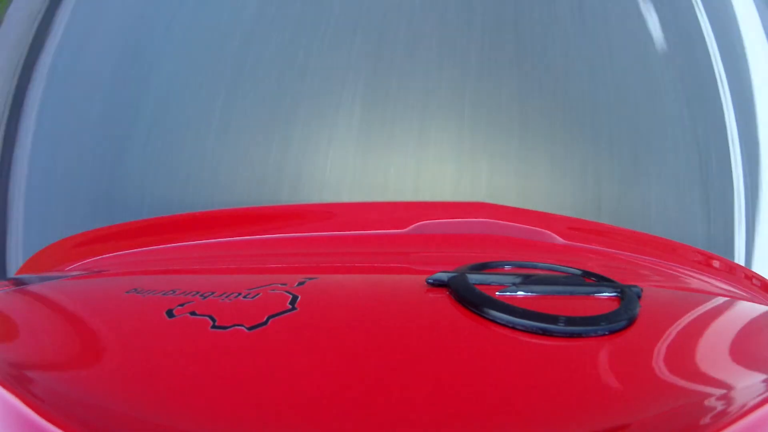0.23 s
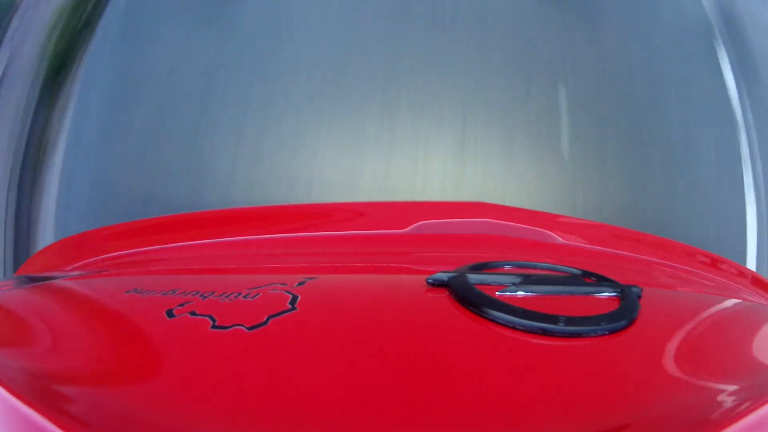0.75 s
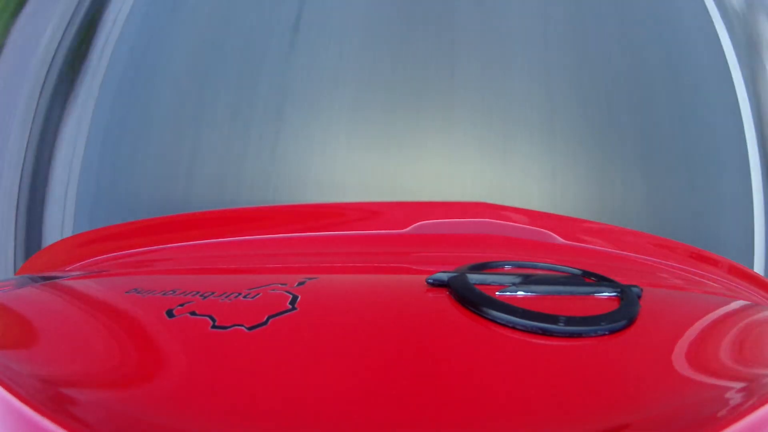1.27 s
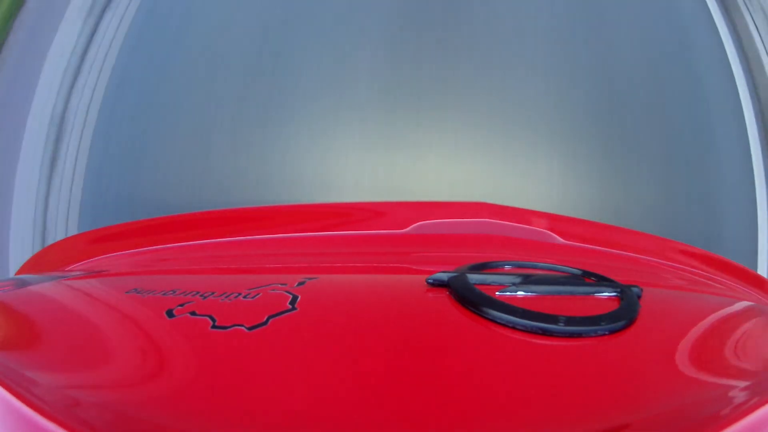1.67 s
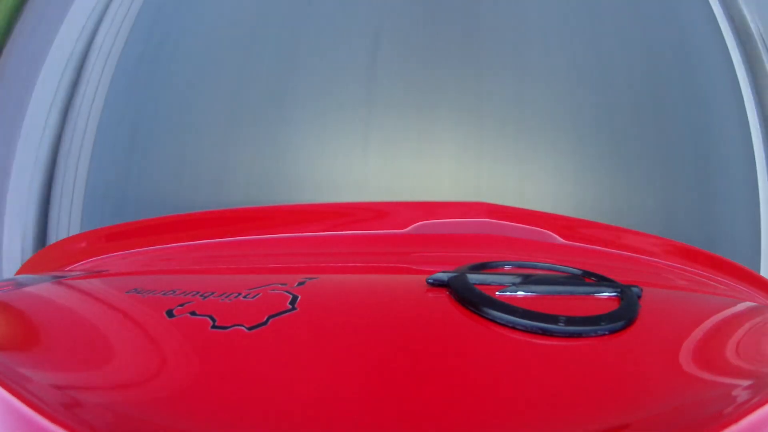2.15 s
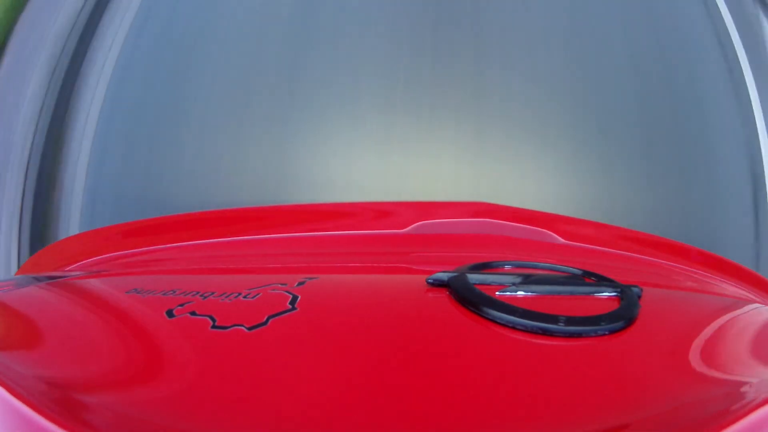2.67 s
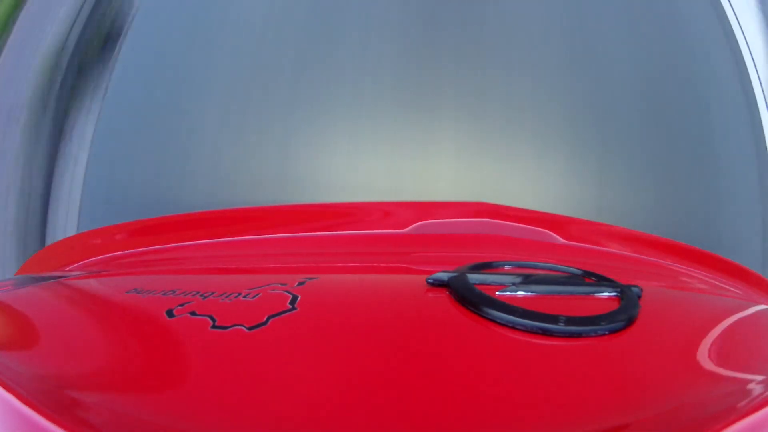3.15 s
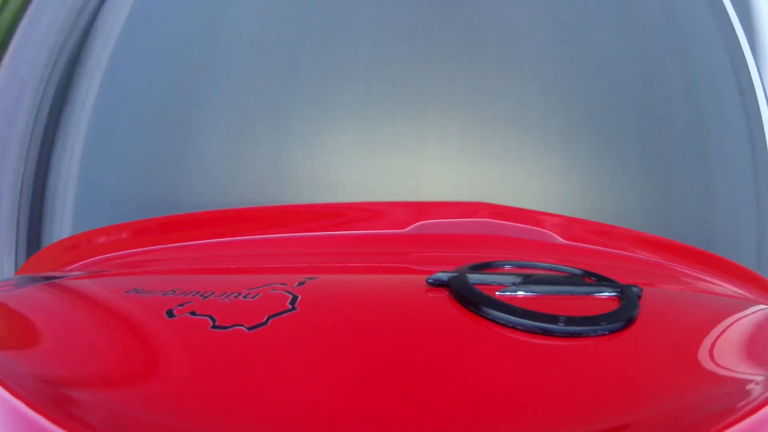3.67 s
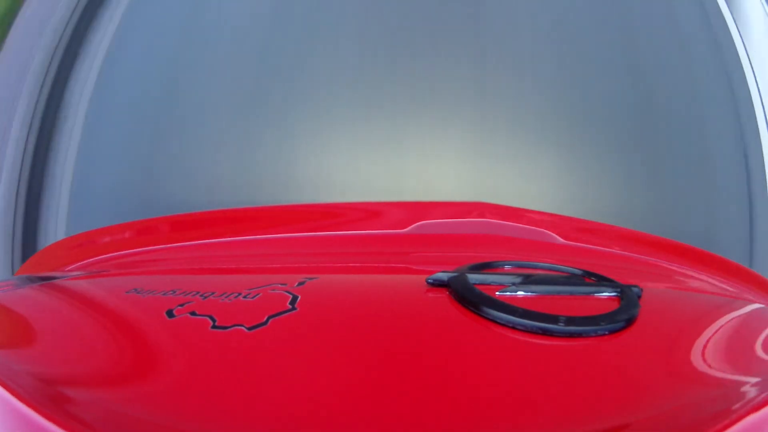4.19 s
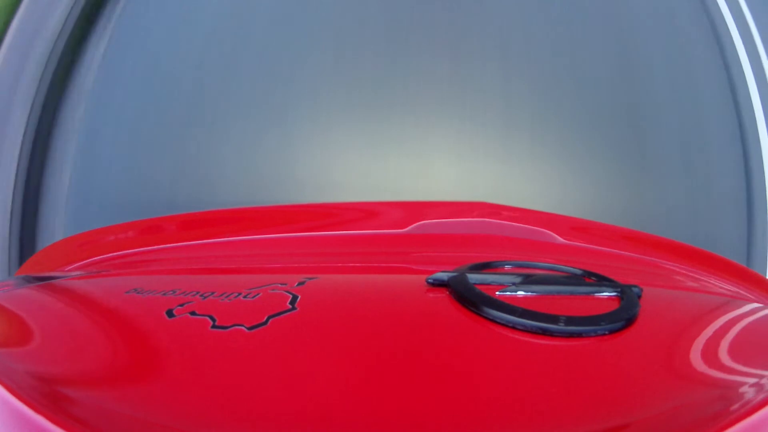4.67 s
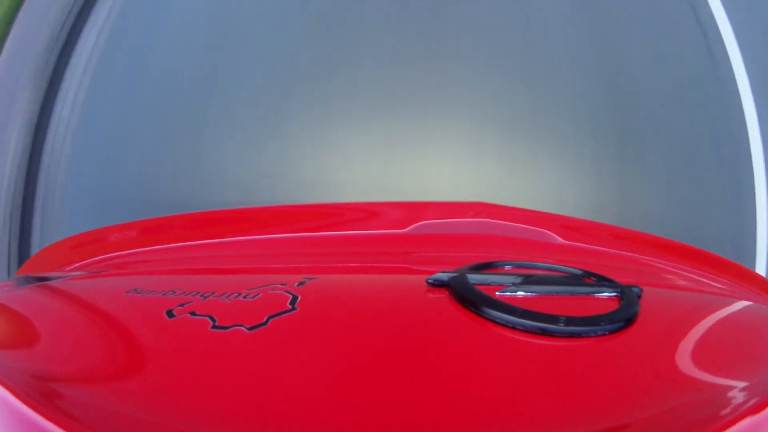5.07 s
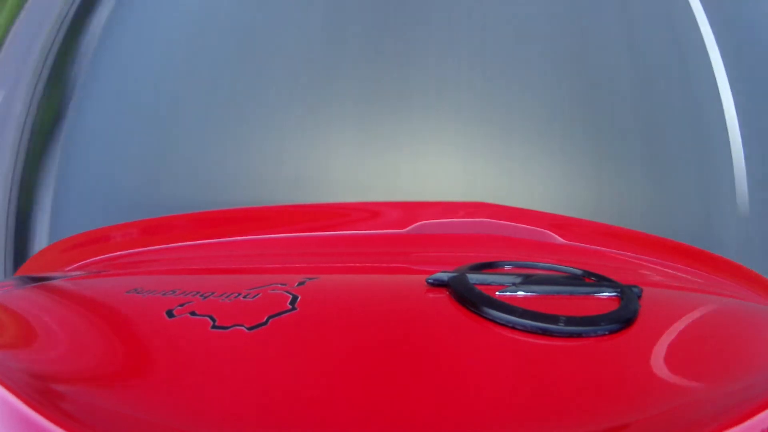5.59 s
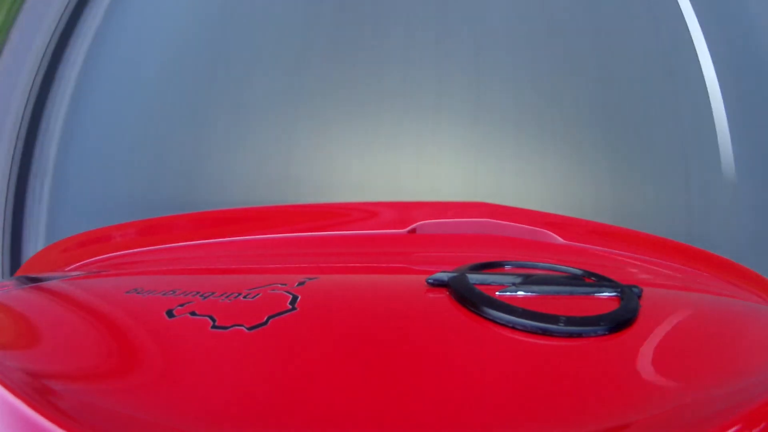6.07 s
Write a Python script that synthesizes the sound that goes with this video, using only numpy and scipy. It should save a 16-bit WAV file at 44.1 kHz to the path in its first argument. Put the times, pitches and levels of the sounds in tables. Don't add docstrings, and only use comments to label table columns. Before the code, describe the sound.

A small turbocharged car's exhaust booms up through one long gear pull, then the throttle lifts and the mount rattles over wind and tyre roar.

```python
import sys
import numpy as np
from scipy import signal
from scipy.fft import rfft, irfft
from scipy.io import wavfile
from scipy.ndimage import uniform_filter1d, minimum_filter1d

SR = 44100
rng = np.random.default_rng(int(sys.argv[2]) if len(sys.argv) > 2 else 0)


def level_to_linear(level):
    exponent = np.asarray(level, float) / 20
    return 10 ** exponent


def transcribe(u):
    v = np.clip(np.atleast_2d(u).T, -1, 1)
    q = np.round(v * 32767).astype(np.int16)
    wavfile.write(sys.argv[1], SR, q)


N = 279594

# frequency in Hz, density in dB per Hz.
HISS_SPECTRUM = [(3000, -23), (5000, -11.5), (7000, -7.5), (10500, -0.5), (12500, -2), (13800, -6),
                 (14800, -1.5), (16500, -15.5)]
# frequency in Hz, density in dB per Hz.
BUFFET_SPECTRUM = [(12, -4), (25, -8.5), (45, 3.5), (70, -16), (120, -17)]
# frequency in Hz, density in dB per Hz.
WAKE_SPECTRUM = [(45, -8), (70, -2.5), (130, -1), (250, -4), (380, -5), (480, -15.5), (650, -41)]
# centre in seconds, rise over the steady wind in dB, half width in seconds.
GUSTS = [(0, -3, 0.18), (.45, 7, .05), (.68, 7, 0.07), (1.7, 1, 0.19), (3.15, 2, .06), (3.6, 11.5, 0.16),
         (4.22, 3.5, 0.12), (4.55, 11, .12), (5.24, 3.5, 0.096), (5.75, 8, 0.042), (6.17, 9.5, 0.05),
         (6.34, 15.5, 0.025)]
# frequency in Hz, density in dB per Hz.
TYRE_SPECTRUM = [(250, -29), (420, -13), (525, -7), (634, -5.5), (733, -5), (792, -0.5), (978, -3.5),
                 (1070, 3), (1160, -3), (1480, -6.5), (1530, -12), (1650, -9.5), (2160, -27.5),
                 (3080, -31.5), (6000, -52), (7800, -89), (13200, -120)]
# frequency in Hz, level in dB, t60 in seconds.
MOUNT_MODES = [(3800, -10, .005), (4500, -4, .007), (5400, 0, .009), (7100, -3, .007), (9300, 0, .01),
               (13000, -11, .005)]
# start in seconds, peak in dB.
KNOCKS = [(5.216, -24), (5.2249, -27), (5.2277, -19), (5.2411, -25), (5.4207, -12), (5.4558, -14),
          (5.4629, -22), (5.4729, -21), (5.4775, -21), (5.5006, -28), (5.5087, -26), (5.5193, -33),
          (5.5328, -36), (5.55, -37), (5.5581, -34), (5.5667, -33), (5.5748, -35), (5.5921, -33),
          (5.6233, -33), (5.6772, -37), (5.7054, -35), (5.7394, -28), (6.1795, -27), (6.2122, -32),
          (6.216, -29), (6.2383, -31), (6.2538, -34), (6.2711, -28), (6.2938, -33), (6.3322, -23)]
# start in seconds, peak in dB, ring in Hz.
GRIT = [(.645, -41, 7400), (.695, -34, 3300), (.71, -30, 3660), (.725, -35, 4100), (.74, -33, 2980),
        (.76, -57, 10800), (.77, -47, 6300), (.824, -37, 4400), (.879, -35, 5840), (.885, -39, 12500),
        (.91, -44, 12500), (.955, -33, 10500), (.957, -32, 13500), (1.0, -39, 12000), (1.05, -39, 5500),
        (1.06, -37, 10800), (1.085, -44, 11500), (1.13, -48, 5600), (1.19, -43, 11000), (1.22, -42, 9800),
        (1.324, -34, 4050)]
# frequency in Hz, density in dB per Hz.
CRACK_SPECTRUM = [(1800, -22), (3000, -9), (4800, 0), (7800, -4), (9400, 0), (11000, -10), (15500, -12)]
# start in seconds, level in dB, pitch in Hz, t60 in seconds.
DRIVELINE_THUMP = (5.213, -14, 52, .2)
# time in seconds, low centre in Hz, high centre in Hz, level in dB.
SPOOL = [(0, 3000, 6000, -90), (.6, 3200, 6500, -68), (.72, 3700, 7800, -51), (.9, 4600, 9800, -57),
         (1.08, 5500, 12000, -56), (1.3, 5700, 13500, -63), (1.7, 6200, 15000, -80),
         (6.34, 6200, 15000, -95)]
# time in seconds, roar level in dB, extra hiss from boost in dB.
FLOW = [(0, -38.5, 1), (.4, -36, -0.5), (1.04, -34, 0.5), (2, -29.5, -5), (2.4, -29, -1), (2.9, -30, 0.5),
        (3.15, -25, -0.5), (3.6, -22, -1.5), (4.2, -21.5, 0.5), (4.48, -17.5, 0.5), (4.75, -18.5, -0.5),
        (5.02, -21, -4), (5.2, -23, 0.5), (5.9, -21.5, -6), (6.34, -22, -4)]
# frequency in Hz, density in dB per Hz.
GAS_SPECTRUM = [(1350, -19.5), (2300, -1), (2670, -11), (2980, -8), (3540, -11), (4110, -9.5), (4480, -15),
                (4880, -12), (5990, -19), (7640, -20.5), (8730, -30), (12600, -29.5), (14400, -27.5),
                (15000, -28.5)]
# frequency in Hz, density in dB per Hz.
RASP_SPECTRUM = [(1200, -27.5), (1500, -5), (1900, 2), (2250, -10.5), (2550, -31), (2900, -13),
                 (3600, -41.5)]
# frequency in Hz, density in dB per Hz.
PIPE_ROAR_SPECTRUM = [(330, -6), (560, -9.5), (656, -9.5), (729, -0.5), (821, -2.5), (908, -6.5),
                      (970, -3.5), (1070, -4), (1280, -10.5), (1460, -11.5), (1600, -15), (2080, -39),
                      (3520, -120)]
# time in seconds, firing rate in Hz.
REVS = [(0, 58.4), (.2, 56.2), (.8, 63.5), (1.4, 72.7), (2, 84.8), (2.6, 98.9), (3.2, 117.4), (4, 144.8),
        (4.7, 167), (5, 173.7), (5.1, 172.4), (5.38, 161.9), (6, 146.5), (6.34, 127)]
# time in seconds, strength in dB, sharpness in dB per order.
PULSE = [(0, -10, 0.1), (.35, -3, -1.9), (.85, -6, -0.9), (1.3, -4.5, -3), (1.45, -4, .5),
         (1.8, -3.75, 0.94), (2.3, 1, -4), (2.8, 2.5, -1.1), (3.5, -1.05, -1.74), (4.2, -7, 2.5),
         (5.07, -13.5, 3.5), (5.14, -12, 8), (5.26, -16.5, 2), (5.36, -19, 4.5), (5.6, -16.5, 0),
         (5.76, -20.5, 2.5), (6, -15, -5.5), (6.34, -15.5, -15)]
ORDERS_DB = [2.66, -12, -22.5, -26, -29.5]
# frequency in Hz, width in Hz, level in dB.
SILENCER = [(85.0, 87, -28), (159, 40.2, 3.5), (191.3, 22, 1.8), (234.2, 38, -0.5), (302.8, 45, 6),
            (333.1, 34, 10), (360, 31, 11), (382, 220, 1), (464, 77.1, -1), (417, 322, -8.5), (628, 13, -1),
            (755, 47, 5)]
# frequency in Hz, width in Hz, level over order 5 in dB.
TAILPIPE = [(340, 35, -2), (455, 35, -7), (540, 40, -12), (735, 50, 6), (985, 60, -3)]
CYLINDER_EARLY = [1.25, -.3, -.3, -.65]
# centre in seconds, depth in dB, half width in seconds.
STUMBLES = [(5.15, -9, .03), (5.193, -18, .026), (5.67, -11, .022), (5.8, -4, .03), (6.27, -4, .03)]

LIFT_S, LIFT_TAKES_S = 5.08, .12


def curves(rows):
    s, *columns = np.transpose(rows)
    return [np.interp(np.arange(N) / SR, s, c) for c in columns]


def ramp(s, takes_s):
    return np.clip((np.arange(N) / SR - s) / takes_s, 0, 1)


def bumps(rows):
    t = np.arange(N) / SR
    return sum(db * np.exp(-((t - s) / half_s) ** 2) for s, db, half_s in rows)


def walk(rate):
    k = int(SR / rate)
    held = np.repeat(rng.standard_normal(N // k + 1), k)
    return .5 * uniform_filter1d(uniform_filter1d(held, k), k)[:N]


def noise(shape, apart):
    hz, db = np.transpose(shape)
    bins = np.log(np.maximum(np.arange(N // 2 + 1) * SR / N, 1))
    gain = level_to_linear(np.interp(bins, np.log(hz), db, left=-90, right=-90))
    mid, side = irfft(rfft(rng.standard_normal((2, N))) * gain, N)
    pair = mid + np.outer([apart, -apart], side)
    return pair / np.sqrt(np.mean(pair ** 2))


def damped_sine(t, hz, t60):
    return np.sin(2 * np.pi * hz * t) * np.exp(-np.log(1000) * t / t60)


def add(out, s, db, modes):
    t = np.arange(int(SR / 20)) / SR
    ring = sum(level_to_linear(g) * damped_sine(t, hz, t60) for hz, g, t60 in modes)
    i = int(s * SR)
    onset = np.minimum(t / .0003, 1)
    out[i:i + len(t)] += (level_to_linear(db) * ring * onset)[:N - i]


def wind(roar_db, coast):
    gust_db = bumps(GUSTS)
    buffet_db = -32.5 + 11.5 * coast + gust_db
    wake_db = -30 + .38 * (roar_db + 31.5) + .3 * gust_db
    buffet = level_to_linear(buffet_db + 1.5 * walk(3)) * noise(BUFFET_SPECTRUM, .04)
    return buffet + level_to_linear(wake_db + 1.2 * walk(12)) * noise(WAKE_SPECTRUM, .03)


def tyres(level, pipe_share):
    return level * np.sqrt(1 - pipe_share) * noise(TYRE_SPECTRUM, .04)


def knock(out, cracks):
    gaps = .0036 * (1 + .25 * rng.standard_normal(len(KNOCKS)))
    for (first_s, peak_db), gap in zip(KNOCKS, gaps):
        carried_db = peak_db + .22 * max(-24 - peak_db, 0)
        for bounce in range(3):
            s = first_s + bounce * gap
            db = carried_db - 9.5 * bounce
            if s >= N / SR:
                continue
            colour = rng.standard_normal((len(MOUNT_MODES), 2))
            modes = [(hz * (1 + .05 * a), g + 2.5 * b, t60)
                     for (hz, g, t60), (a, b) in zip(MOUNT_MODES, colour)]
            add(out, s - .0003, db - 9, modes)
            add(cracks, s - .0003, db - 19, [(60, 24, .008)])


def grit(out, cracks):
    for s, db, hz in GRIT:
        modes = [(hz, 0, .01), (1.27 * hz, -3, .006), (.8 * hz, -4, .006), (1.7 * hz, -8, .003)]
        add(out, s, db - 1, modes)
        add(cracks, s, db - 19, [(60, 18, .0068)])


def thump():
    s, db, hz, t60 = DRIVELINE_THUMP
    t = np.maximum(np.arange(N) / SR - s, 0)
    return level_to_linear(db) * damped_sine(t, hz, t60)


def impacts():
    out, cracks = np.zeros(N), np.zeros(N)
    knock(out, cracks)
    grit(out, cracks)
    return out + thump() + cracks * noise(CRACK_SPECTRUM, .15)


def turbo():
    low_hz, high_hz, db = curves(SPOOL)

    def band(centre_hz, width_hz):
        shape = [(1, 0), (width_hz, -3), (2.5 * width_hz, -25)]
        return np.cos(2 * np.pi * np.cumsum(centre_hz) / SR) * noise(shape, .3)

    return level_to_linear(db + 9.5 * walk(110)) * (band(low_hz, 650) + level_to_linear(-1) * band(high_hz, 1400))


def gas_hiss(hz, roar_db, boost_db, throttle, puff):
    coast = 1 - throttle
    load_db = -49 + 4 * np.log2(hz / 100) + .96 * (roar_db + 29.5)
    db = throttle ** 2 * load_db + (1 - throttle ** 2) * -40.5 + boost_db
    level = level_to_linear(db - 1.2 * (2 - throttle) + 1.6 * walk(30))
    gas = level * (1.315 + .26 * puff) * noise(GAS_SPECTRUM, .081)
    dull = signal.lfilter(*signal.butter(2, 5200, fs=SR), gas)
    return throttle * gas + coast * dull


def rasp(roar_db, throttle, puff):
    db = -43.66 + 1.06 * (roar_db + 30.5)
    return level_to_linear(db + .75 * walk(40)) * throttle * puff * noise(RASP_SPECTRUM, .07)


def pipe_roar(level, pipe_share, puff):
    return level * np.sqrt(pipe_share) * (.66 + .36 * puff) * noise(PIPE_ROAR_SPECTRUM, .04)


def gas_puffs(cycle):
    puff = .45 + 2.2 * np.exp(-((cycle + .1) % 1) / .22)
    return uniform_filter1d(uniform_filter1d(puff, SR // 900), SR // 900)


def firing_unevenness(hz, throttle):
    loaded = np.interp(hz, [97, 136], [.045, .2])
    coasting = .1 + .085 * ramp(LIFT_S + LIFT_TAKES_S, .68)
    return throttle * loaded + (1 - throttle) * coasting


def order_levels(hz, throttle):
    strength_db, sharp_db = curves(PULSE)
    k = np.arange(5)[:, None]
    cold_hz = ((k + 1) * hz * (hz / 100) ** -.18)[:, ::64]
    power = sum(level_to_linear(db) ** 2 / (1 + (2 * (cold_hz - f) / w) ** 2) ** 2 for f, w, db in SILENCER)
    ring_db = uniform_filter1d(np.repeat(10 * np.log10(power), 64, axis=1)[:, :N], 64)
    falter_db = bumps(STUMBLES) * np.where(k, .4, 1)
    overrun_db = (k > 1) * (1 - throttle) * -18
    return strength_db + k * sharp_db + np.c_[ORDERS_DB] + ring_db + falter_db + overrun_db


def exhaust(hz, order_db, uneven, throttle):
    turns = np.cumsum(hz) / SR
    firing = np.arange(int(turns[-1]) + 2)
    chance = rng.standard_normal((len(firing), 2)).T
    ragged = 1 + 3 * (1 - throttle)
    early, strong = (np.interp(turns, firing, c) * ragged for c in chance)
    cylinder_early = np.interp(turns, firing, np.array(CYLINDER_EARLY)[firing % 4])
    early = throttle * cylinder_early + .3 * early
    phase = 2 * np.pi * turns + np.pi / 2
    gains = [*level_to_linear(order_db)]
    fifth = gains[-1]
    for k in (6, 7, 8):
        gains.append(fifth * sum(level_to_linear(db - 6 * (k - 6)) / (1 + (2 * (k * hz - f) / w) ** 2)
                                 for f, w, db in TAILPIPE))
    steep = np.clip((hz - 62) / 25, 0, 1)
    wave = 0
    for k, gain in enumerate(gains):
        shape_lag = steep * k * np.pi / 2 + (1 - steep) * .2 * k ** 2
        lag = shape_lag - min(k + 1, 2.5) * uneven * early
        wave = wave + gain * np.cos((k + 1) * phase - lag)
    return np.sqrt(2) * level_to_linear(uneven * 4 * strong) * wave, turns % 1


def scene():
    hz, = curves(REVS)
    roar_db, boost_db = curves(FLOW)
    throttle = 1 - ramp(LIFT_S, LIFT_TAKES_S)
    uneven = firing_unevenness(hz, throttle)
    boom, cycle = exhaust(hz, order_levels(hz, throttle), uneven, throttle)
    puff = gas_puffs(cycle)
    pipe_share = throttle * np.interp(hz, [85, 112], [.55, 1])
    roar_level = level_to_linear(roar_db + 1.3 + .58 * walk(14))
    car = wind(roar_db, 1 - throttle) + tyres(roar_level, pipe_share) + turbo()
    car += gas_hiss(hz, roar_db, boost_db, throttle, puff) + rasp(roar_db, throttle, puff)
    car += pipe_roar(roar_level, pipe_share, puff) + boom
    left_over_right_db = -3.7 + 4 * ramp(2.3, .4) * throttle
    balance_db = np.array([left_over_right_db, -left_over_right_db]) / 2 + .11
    return car * level_to_linear(balance_db) + impacts()


def limit(x, top):
    span = SR // 100
    gain = minimum_filter1d(np.minimum(top / (np.abs(x) + 1e-9), 1), span)
    return x * uniform_filter1d(gain, span)


def top_cut(x):
    return signal.sosfilt(signal.butter(12, 16400, fs=SR, output="sos"), x)


def record(dry):
    left = signal.lfilter(*signal.butter(1, 30, "high", fs=SR), dry[0])
    whine = np.sqrt(2) * level_to_linear(-62) * np.sin(2 * np.pi * 13150 * np.arange(N) / SR)
    loud_db = 10 * np.log10(uniform_filter1d(dry[1] ** 2, SR // 5) + 1e-9)
    duck = level_to_linear(-1.1 * np.maximum(loud_db + 10, 0))
    own_noise = duck * (whine + level_to_linear(-58) * noise(HISS_SPECTRUM, .6))
    wet = limit(np.array([left, dry[1]]), 1.04) + own_noise
    wet = signal.sosfilt(signal.ellip(8, .3, 60, 15000, fs=SR, output="sos"), wet)
    return top_cut(np.clip(wet, -1, 1))


dry = scene()
out = record(dry)
transcribe(out)
```